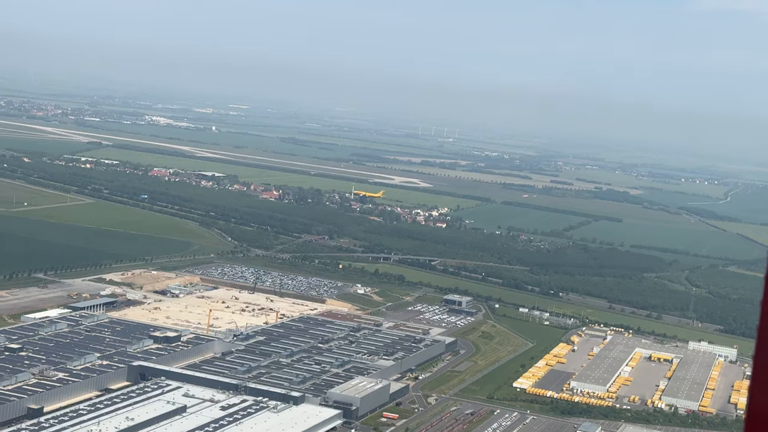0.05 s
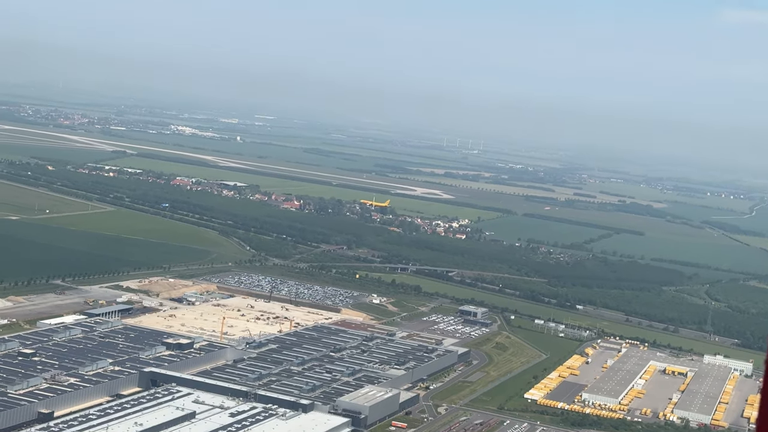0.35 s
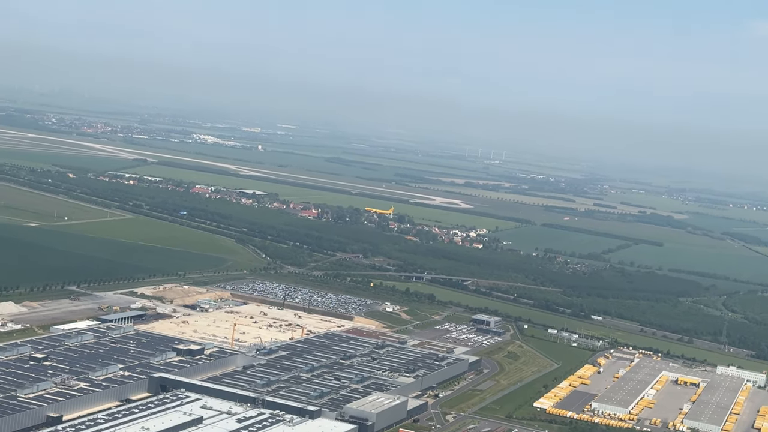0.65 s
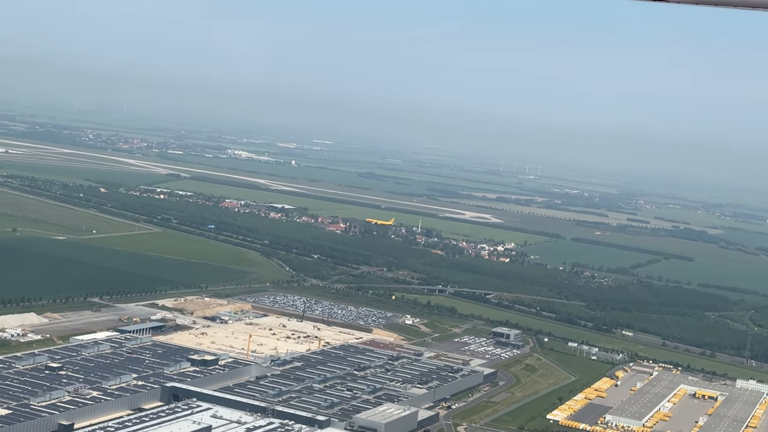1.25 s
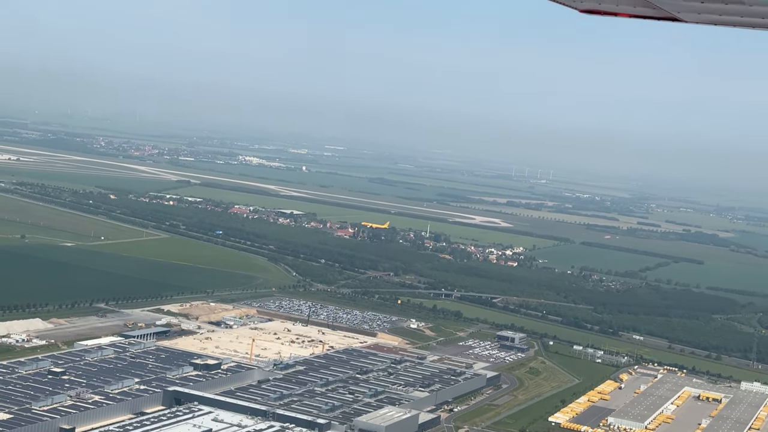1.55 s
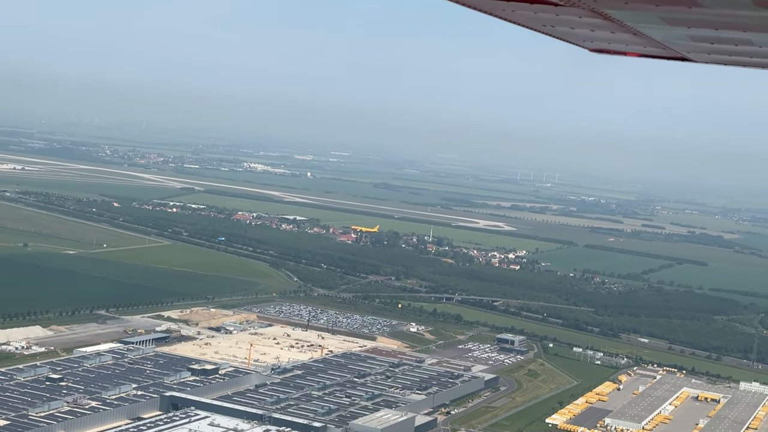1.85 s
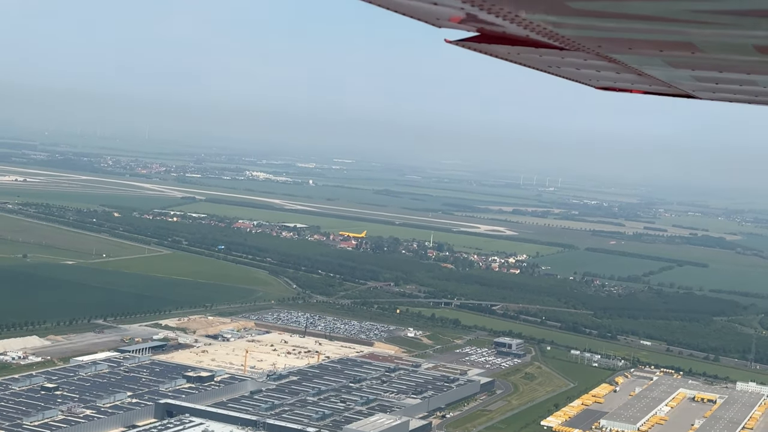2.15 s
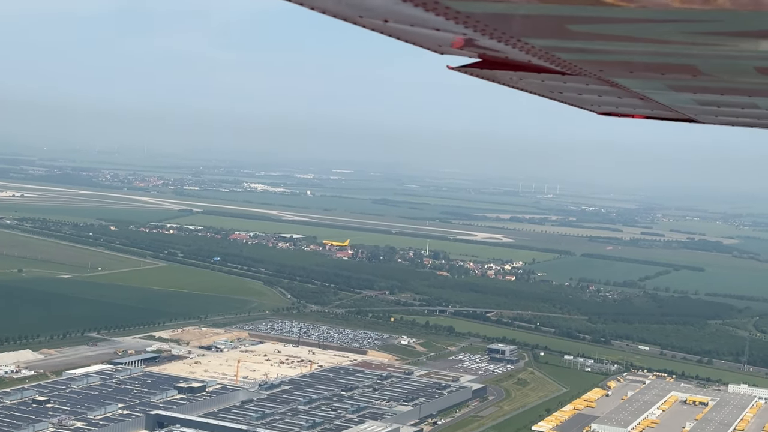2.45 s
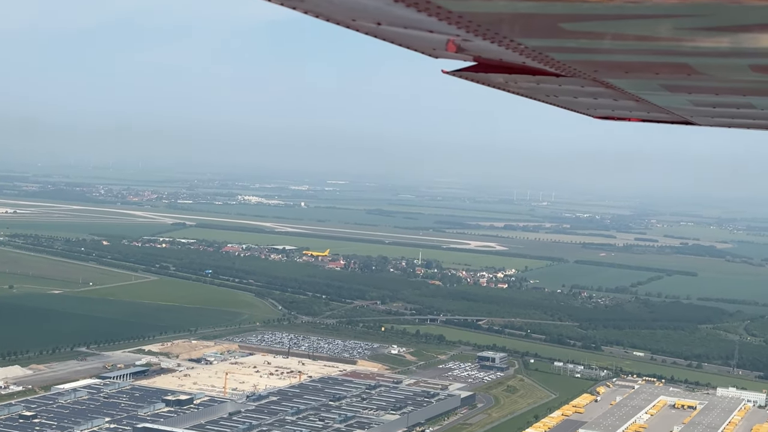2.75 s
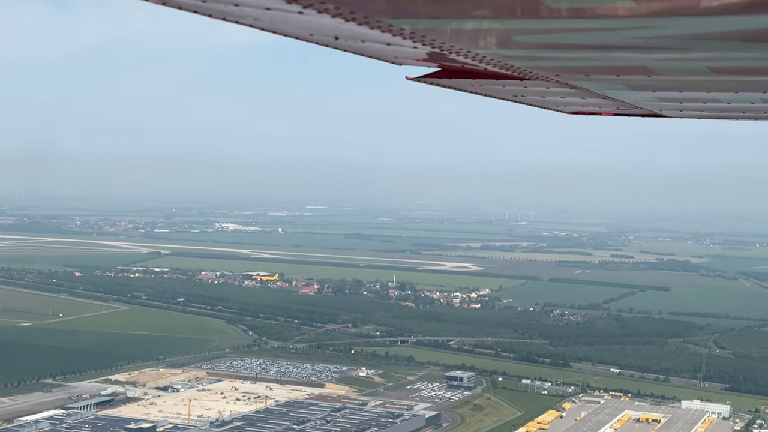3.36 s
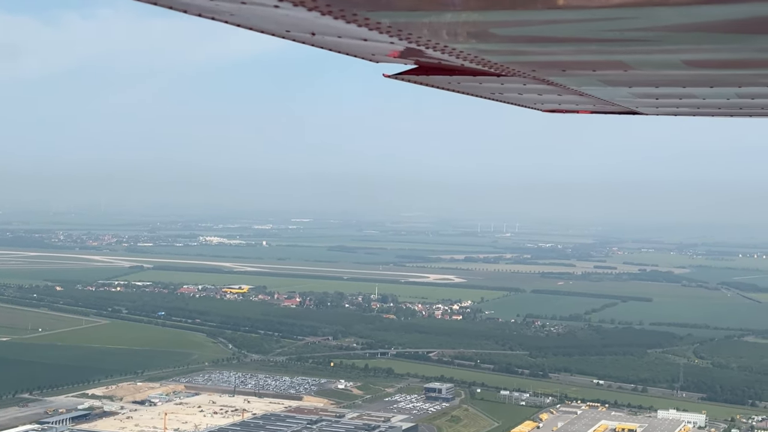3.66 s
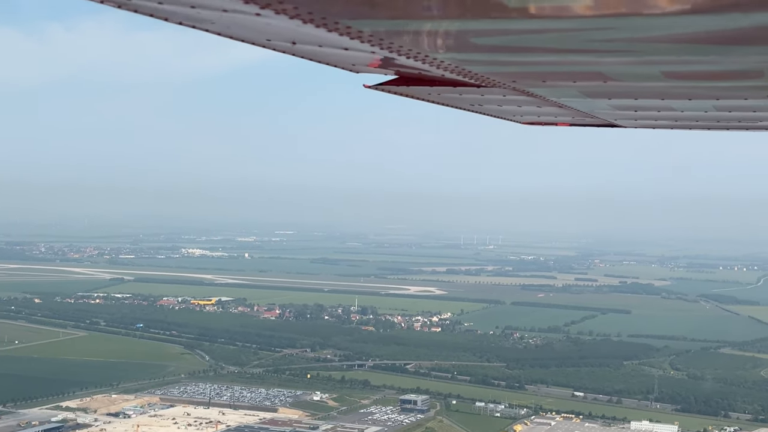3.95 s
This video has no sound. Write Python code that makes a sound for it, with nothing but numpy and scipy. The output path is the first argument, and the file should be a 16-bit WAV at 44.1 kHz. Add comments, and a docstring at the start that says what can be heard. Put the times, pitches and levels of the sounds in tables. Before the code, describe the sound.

Steady propeller and engine drone with wind rush inside a light aircraft in flight.

```python
"""Light aircraft cabin

In steady flight a two-blade propeller drones, geared down from a four-cylinder four-stroke engine
whose firing hum and faint gear whine run beside it. Turbulent air shakes the cabin shell, rushes
along the windows, hisses through a vent and whistles at a gap. As the microphone turns, the whine
shifts to higher overtones and a nasal cabin resonance comes forward."""
import sys
import numpy as np
from scipy import signal
from scipy.fft import rfft, irfft, next_fast_len
from scipy.io import wavfile
from scipy.ndimage import uniform_filter1d, map_coordinates

SR = 44100
rng = np.random.default_rng(int(sys.argv[2]) if len(sys.argv) > 2 else 0)


def store_wav(level_fs):
    """Save 16-bit WAV to argv[1]."""
    pcm = np.round(np.clip(np.atleast_2d(level_fs), -1, 1) * 32767)
    wavfile.write(sys.argv[1], SR, pcm.T.astype(np.int16))


N = 176400
GEAR_RATIO = 2.4317  # crankshaft turns per propeller turn
WIDEN_ABOVE_HZ, WIDEN_CYCLES_PER_HZ = 8000, .000326
BAND_LIMIT_HZ = 15400

# Propeller speed. Each row: time in seconds, blade passes per second.
BLADE_PASS_RATE = [(0, 71.26), (.7, 71.3), (1.4, 71.02), (2, 70.81), (2.6, 70.72), (3.05, 70.7),
                   (3.5, 71.02), (4, 70.75)]
# Propeller harmonics. Each row: multiple of the blade rate, base level in dB, left over right in dB,
# left phase lead in radians, change over the microphone's turn in dB.
BLADE_TONES = [(1, -20, .7, -0.16, 0), (2, -27, 0.6, 0.077, 1.5), (3, -39.5, -9, .25, -1),
               (4, -36.5, 0, .1, -4.5)]
# Loudness of the drone. Each row: time in seconds, gain in dB.
DRONE_GAIN = [(0, -2.2), (.5, 0.5), (1.3, 1.4), (1.9, 0.3), (2.6, -0.8), (3.1, -1.9), (3.5, 0), (4, -1.2)]
# The overtone that a cabin resonance lifts. Columns as in BLADE_TONES.
RESONANT_TONE = [(6, -40.5, 1, .1, -0.9)]
# Surges of that overtone. Each row: peak time in seconds, length in seconds, rise in dB.
RESONANT_SURGES = [(.36, 0.35, 13), (1.3, 0.25, 10), (2.4, .2, 7), (2.92, 0.094, 12), (3.66, .25, 8)]
# The microphone's turn. Each row: time in seconds, share of the turn from 0 to 1.
MIC_TURN = [(0, 0.2), (.6, 0.14), (1.3, 0.45), (1.9, .9), (2.6, 0.8), (4, 1)]

# Engine harmonics. Columns as in BLADE_TONES, with multiples of the rate named alongside.
FIRING_TONES = [(1, -39, 2, 0.063, 1.5), (2, -38.5, 3, 0.17, 4), (3, -36.5, 4, 0.083, 5),
                (4, -29, -2.5, -0.27, -0.7)]  # four-stroke cycle rate
GEAR_TONES = [(5, -47, 9, -0.19, -3), (10, -50, -7, -1.5, 4), (16, -48, 11, 0.93, -7.5),
              (19, -67, 5, 0, 12), (20, -62.5, 9, 0.03, 12), (21, -63, 8, -0.14, 7)]  # crankshaft rate
# Swells of the engine's growl. Each row: peak time in seconds, length in seconds, rise in dB.
GROWL_SWELLS = [(.47, 0.16, 3), (1.47, 0.37, 4.5), (2.8, 0.23, 2.8)]

# Noise spectra. Each row: frequency in Hz, base density in dB per Hz.
EXHAUST_SPECTRUM = [(60, -140), (110, -82), (150, -47.5), (175, -46), (200, -49.5), (250, -82), (400, -140)]
SHELL_SPECTRUM = [(18, -85), (28, -69), (42, -60), (60, -41.5), (82, -43.5), (110, -38.5), (135, -43.5),
                  (190, -44.5), (240, -47), (320, -48), (480, -53.5), (800, -71), (2000, -110)]
WINDOW_SPECTRUM = [(150, -89), (400, -57), (550, -56.5), (625, -54.5), (700, -58), (870, -58.5),
                   (1000, -63), (1270, -67), (1440, -66), (1720, -69.5), (2080, -72), (2550, -79),
                   (2770, -77.5), (3150, -80), (4500, -93.5), (9000, -115)]
VENT_SPECTRUM = [(800, -101), (2500, -80), (4800, -82), (6500, -80.5), (9000, -82), (11300, -82),
                 (13000, -83.5), (15600, -92)]
NASAL_SPECTRUM = [(900, -140), (1300, -106), (1570, -67.5), (1690, -74.5), (1860, -73), (2100, -95),
                  (2800, -140)]
# Likeness of the two channels. Each row: frequency in Hz, left-right correlation.
SHELL_CORRELATION = [(60, 1), (100, 1), (160, 0.87), (250, 0.81), (450, 0.89)]
WINDOW_CORRELATION = [(450, 0.55), (650, 0.16), (850, 0.13), (1100, 0.33), (1400, 0.44), (1750, 0.5),
                      (2300, 1), (3300, 0.65)]
VENT_CORRELATION = [(3400, .86), (4300, .98), (5000, 1), (13000, 1)]
NASAL_CORRELATION = [(1700, 0.55)]
# Strength of the turbulence. Each row: time in seconds, gain of the shell rumble in dB.
GUSTS = [(0, 0.6), (.45, 0.4), (.8, 0.8), (1.45, 1.2), (1.8, 0.5), (2.1, -2), (2.4, 1), (2.85, 0.6),
         (3.2, -1.5), (3.6, -0.7), (4, 1)]
# Puffs through the vent. Each row: peak time in seconds, length in seconds, rise of the hiss in dB.
VENT_PUFFS = [(.996, 0.033, 1), (1.535, 0.056, 4.5), (2.155, 0.039, 4), (2.95, .04, 3), (3.45, .04, 2.5)]
# Whistles and short rushes at a window gap. Each row: peak time in seconds, length in seconds,
# pitch in Hz, half-width in Hz, peak density in dB per Hz.
GAP_WHISTLES = [(.3, 0.63, 2290, 115, -68), (.7, 1.2, 2070, 100, -71.5), (0.99, 0.043, 2200, 380, -68),
                (1.25, 1.9, 3336, 60, -73.5), (1.1, 1, 3600, 80, -76.5), (1.55, 1, 4350, 90, -84)]


def propeller(blade_passes):
    """Periodic blade pulses form a harmonic series; one overtone surges in a cabin resonance."""
    drone = harmonics(blade_passes, BLADE_TONES, waver_db=0.97, waver_rad=0.12, waver_hz=4.05)
    resonance = harmonics(blade_passes, RESONANT_TONE, waver_db=5.2, waver_rad=1.0, waver_hz=7.5)
    return amp(curve(DRONE_GAIN)) * drone + amp(rises(RESONANT_SURGES)) * resonance


def engine(blade_passes):
    """Periodic firing hums amid exhaust noise; gearing locks hum and whine to the propeller's speed."""
    crank_turns = blade_passes / 2 * GEAR_RATIO
    cycles = crank_turns / 2  # four strokes take two turns
    hum = harmonics(cycles, FIRING_TONES, waver_db=-1.5, waver_rad=0.096, waver_hz=5.4)
    exhaust = stereo_noise(EXHAUST_SPECTRUM, SHELL_CORRELATION, patchy_db=0.27)
    whine = harmonics(crank_turns, GEAR_TONES, waver_db=1.0, waver_rad=0.8, waver_hz=7)
    return amp(rises(GROWL_SWELLS)) * (hum + exhaust) + whine


def airflow():
    """Turbulent pressure makes broadband noise at shell, windows and vent, modulated by the same gusts."""
    gust_db, puff_db = curve(GUSTS), rises(VENT_PUFFS)
    flutter = wobble(22.0)
    rumble_db = gust_db + 0.082 * flutter
    rumble = amp(rumble_db) * stereo_noise(SHELL_SPECTRUM, SHELL_CORRELATION, patchy_db=-0.37)
    rush_db = 0.26 * gust_db + 0.2 * puff_db + 0.68 * flutter
    rush = amp(rush_db) * stereo_noise(WINDOW_SPECTRUM, WINDOW_CORRELATION, patchy_db=0.72)
    hiss_db = 0.15 * gust_db + puff_db + 0.34 * flutter + 0.65 * wobble(70)
    hiss = amp(hiss_db) * stereo_noise(VENT_SPECTRUM, VENT_CORRELATION, patchy_db=0.8)
    # Above 8 kHz the right channel leads in phase, which widens the hiss.
    shift_rad = lambda hz: np.pi * WIDEN_CYCLES_PER_HZ * np.maximum(hz - WIDEN_ABOVE_HZ, 0)
    return rumble + rush + filtered(hiss, lambda hz: np.exp(1j * shift_rad(hz) * [[-1], [1]]))


def nasal_resonance():
    """A cabin resonance concentrates noise in a band that grows as the microphone turns into it."""
    return curve(MIC_TURN) * stereo_noise(NASAL_SPECTRUM, NASAL_CORRELATION, patchy_db=1.2)


def window_gap():
    """Flow briefly excites the narrow resonances of a gap, each a band of noise heard as a whistle."""
    out = np.zeros(N)
    for peak_s, length, pitch, width, db in GAP_WHISTLES:
        band = filtered(rng.standard_normal(N), lambda hz: np.exp(-((hz - pitch) / width) ** 2))
        out += np.sqrt(SR / 2) * amp(db) * swell(peak_s, length) * band
    return out


def harmonics(cycles, table, waver_db, waver_rad, waver_hz):
    """Superposed multiples of one rate waver in level and phase and change as the microphone turns."""
    out, sides = np.zeros((2, N)), np.array([[.5], [-.5]])
    for multiple, db, pan_db, lead_rad, turn_db in table:
        phase = 2 * np.pi * (multiple * cycles + rng.random()) + waver_rad * wobble(waver_hz)
        level_db = db + turn_db * curve(MIC_TURN) + waver_db * wobble(waver_hz)
        out += np.sqrt(2) * amp(level_db + sides * pan_db) * np.sin(phase + sides * lead_rad)
    return out


def stereo_noise(spectrum, correlation, patchy_db):
    """Two independent noises mix as mid and side; their power ratio sets the left-right correlation."""
    spectrogram = signal.stft(rng.standard_normal((2, N)), nperseg=512)[2]
    # The gain varies in random patches of frequency and time.
    patches = uniform_filter1d(rng.standard_normal(spectrogram.shape[1:]), size=9, axis=0)
    patches = uniform_filter1d(patches, size=14, axis=1)
    pair = signal.istft(spectrogram * amp(patchy_db * patches / patches.std()), nperseg=512)[1][:, :N]

    angle = lambda hz: np.arccos(np.clip(along(correlation, hz), -1, 1)) / 2
    response = lambda hz: amp(along(spectrum, hz)) * [np.cos(angle(hz)), np.sin(angle(hz))]
    mid, side = filtered(pair, response)
    return np.sqrt(SR / 2) * np.array([mid + side, mid - side])


def filtered(x, response):
    """Filtering multiplies the spectrum of x by a complex frequency response."""
    size = next_fast_len(N + SR // 2)
    return irfft(rfft(x, size) * response(np.fft.rfftfreq(size, 1 / SR)), size)[..., :N]


def amp(db):
    """Amplitude grows tenfold for every 20 dB."""
    return 10 ** (np.asarray(db) / 20)


def along(points, hz):
    """Interpolation of (Hz, value) points on a logarithmic frequency axis."""
    freqs, values = np.transpose(points)
    return np.interp(np.log(hz + 1), np.log(freqs + 1), values)


def curve(points):
    """Linear interpolation of (seconds, value) points."""
    return np.interp(np.arange(N) / SR, *np.transpose(points))


def wobble(rate):
    """Smooth random modulation: a spline through rate knots a second."""
    return map_coordinates(rng.standard_normal(1024), [np.arange(N) * rate / SR + 2], mode="wrap")


def swell(peak_s, length):
    """A Gaussian envelope of height 1, length seconds between its 1/e points."""
    return np.exp(-(2 * (np.arange(N) / SR - peak_s) / length) ** 2)


def rises(table):
    """Gaussian swells add to one gain curve in dB."""
    return sum(db * swell(peak_s, length) for peak_s, length, db in table)


def scene():
    """Sound pressures superpose: propeller and engine share one shaft speed amid the noise of the air."""
    blade_passes = np.cumsum(curve(BLADE_PASS_RATE)) / SR
    return propeller(blade_passes) + engine(blade_passes) + airflow() + nasal_resonance() + window_gap()


def record(dry):
    """The microphone acts as a low-pass filter, keeping nothing above its band limit."""
    return filtered(dry, lambda hz: hz < BAND_LIMIT_HZ)


dry = scene()
out = record(dry)
store_wav(out)
```